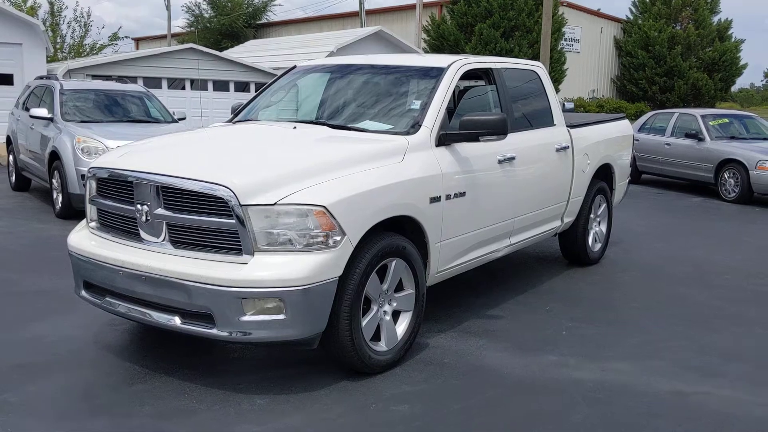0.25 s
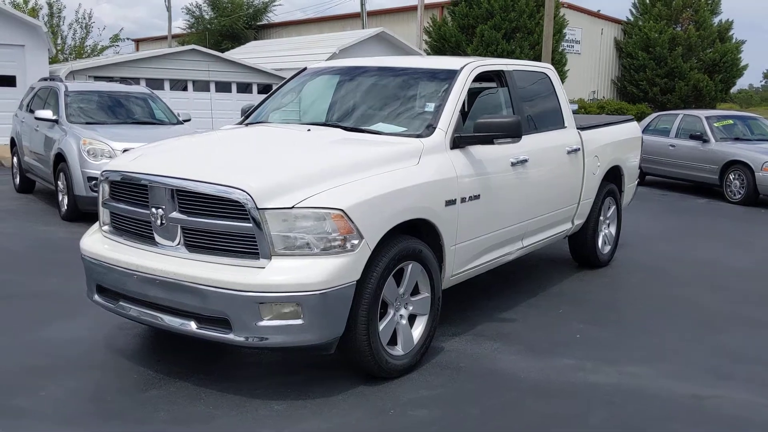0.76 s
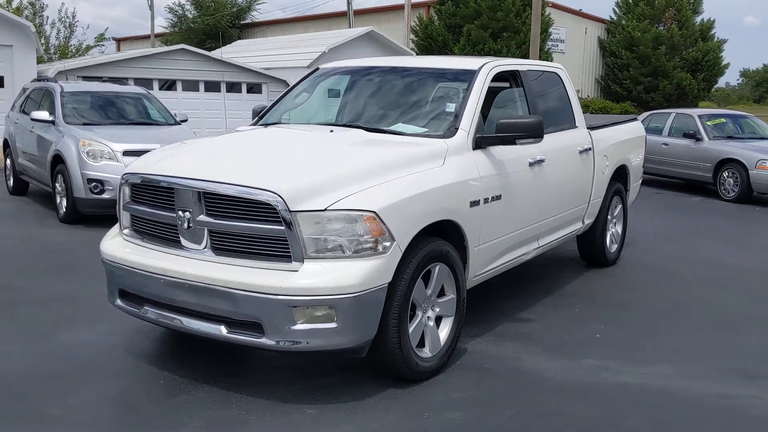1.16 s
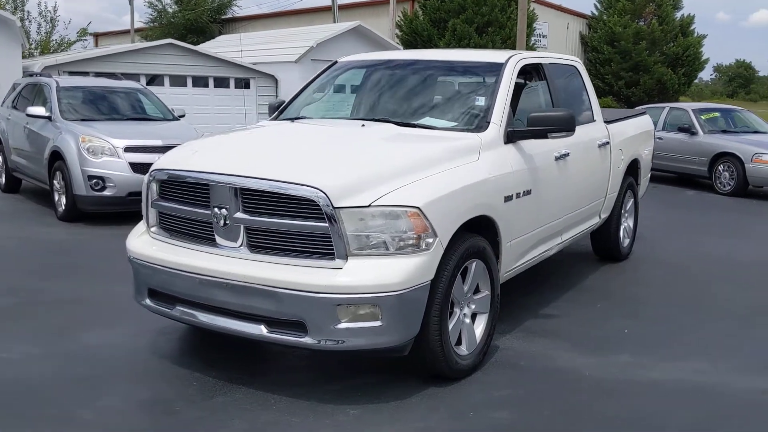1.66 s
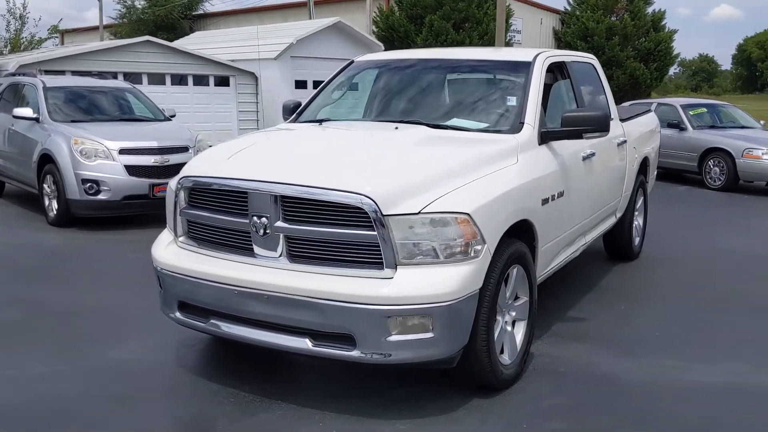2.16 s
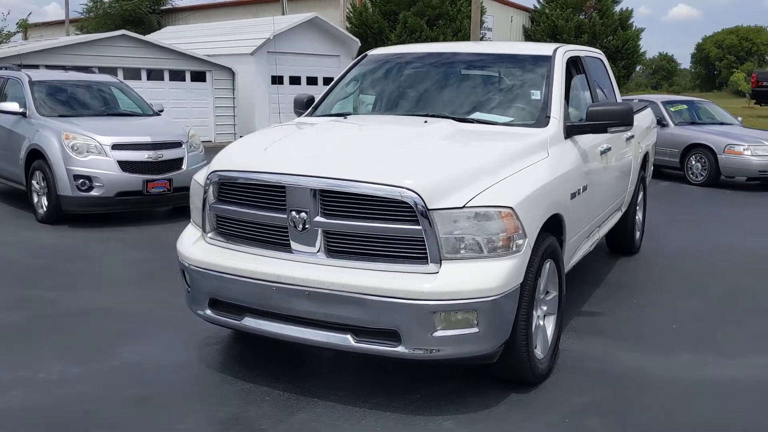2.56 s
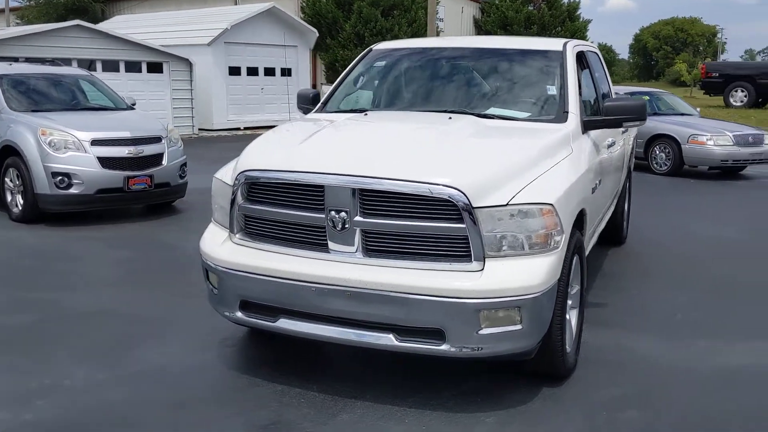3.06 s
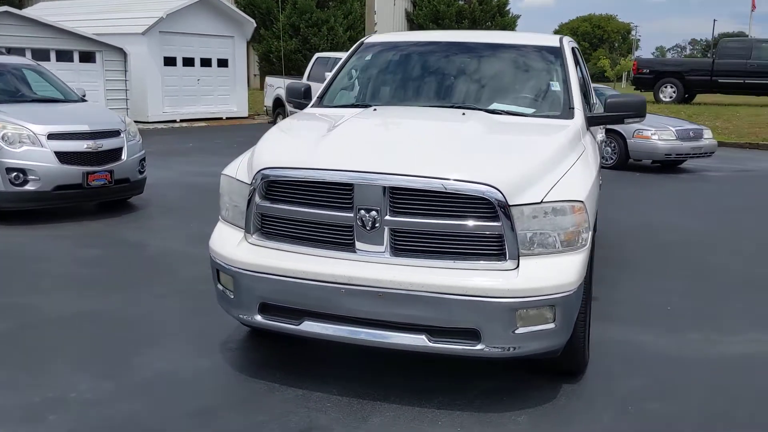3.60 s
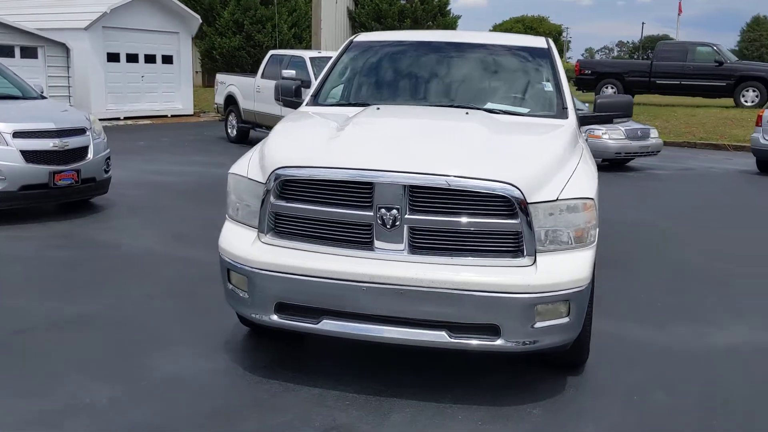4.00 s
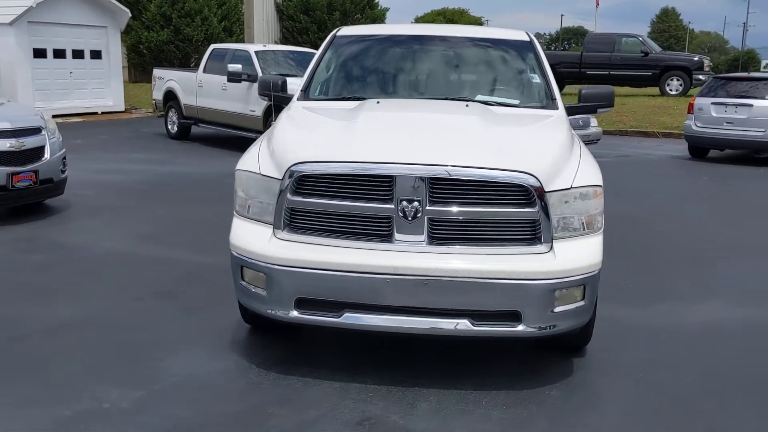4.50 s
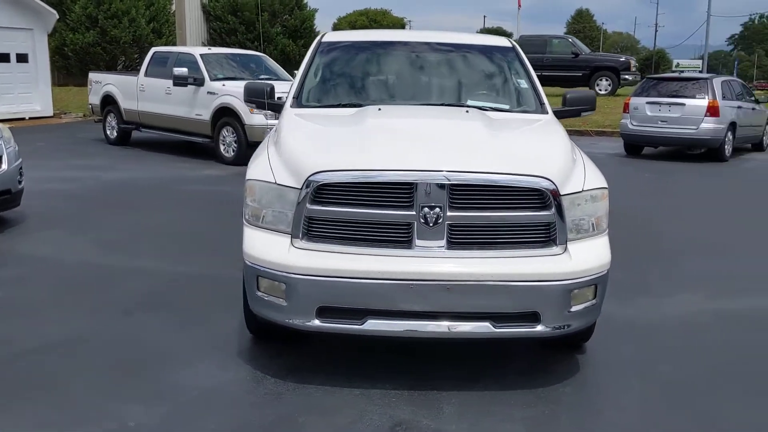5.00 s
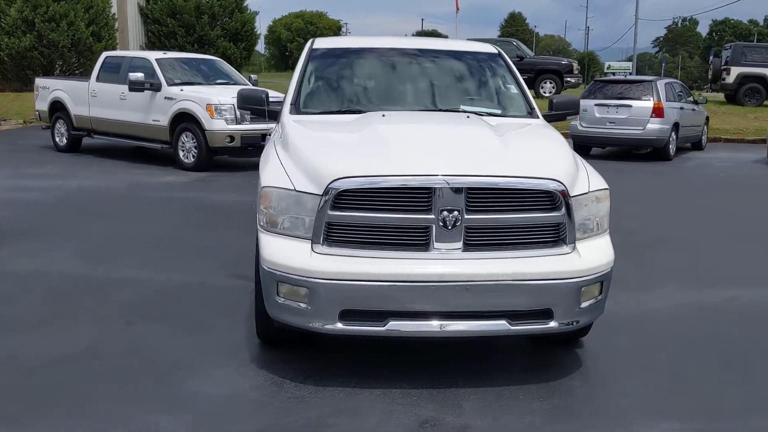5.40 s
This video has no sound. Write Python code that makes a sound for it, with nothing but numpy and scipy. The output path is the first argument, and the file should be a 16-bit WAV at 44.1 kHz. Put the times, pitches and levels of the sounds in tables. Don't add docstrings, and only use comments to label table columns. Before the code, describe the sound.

Passing road vehicles drone and fade behind an idling pickup, whose soft ticking grows clearer, with a few handling clicks on the microphone.

```python
import sys
import numpy as np
from scipy import signal
from scipy.fft import rfft, irfft, next_fast_len
from scipy.io import wavfile
from scipy.ndimage import uniform_filter1d

SR = 44100
rng = np.random.default_rng(int(sys.argv[2]) if len(sys.argv) > 2 else 0)


def bounce(signal):
    frames = np.transpose(np.atleast_2d(signal))
    limited = np.clip(frames, -1, 1)
    pcm = np.round(limited * 32767).astype(np.int16)
    wavfile.write(sys.argv[1], SR, pcm)


def makeup_ratio(level_db):
    decades = np.asarray(level_db, float) / 20
    return 10 ** decades


N = 249118
T = np.arange(N) / SR

LAG_S = 0.00034
SHIFT_S = 1.85
LOST_S, LOST_FOR_S = 5.2088, .0232

# t/s, cycles f/Hz
IDLE_SPEED = [(0, 6.8763), (1, 6.8048), (2.8, 6.6495), (4, 6.765), (5.65, 6.6624)]
# tone number (times the cycle rate), level/dB
IDLE_TONES = [(8, -54), (11, -55), (12, -62), (13, -51.5), (16, -49), (21, -63.5), (22, -52.5), (24, -56.5)]
# t/s, fan level/dB, tick level/dB
WALK = [
    (0, -62, -49),
    (1.5, -58, -51.5),
    (2.5, -56, -51),
    (2.8, -57.5, -48.5),
    (4.5, -57.5, -47.5),
    (5.65, -57.5, -48.5),
]
# f/Hz, level/dB per Hz
FAN_SPECTRUM = [(1400, -6), (2400, 1.5), (3300, -7.5), (4000, -12.5), (4800, -4), (6000, -14),
                (7600, -11.5), (8800, -7.5), (10000, -13.5), (11400, -10.5), (12400, -15.5), (13600, -17),
                (15000, -17), (15800, -21)]
# f/Hz, left-right level/dB
GRILLE_LEAN = [(2200, -4.5), (3900, 11), (5000, 0), (5900, -6), (7300, 5), (8100, 4.5), (9200, 9.5),
               (10300, -8), (11500, -9), (12600, -9), (13500, -11), (15500, -4)]
# (f/Hz, width f/Hz, level/dB)
MAIN_TICK = (0, -0.81, 0.08, 0, [(4800, 3600, 7), (8370, 2000, 6), (11040, 1800, 5), (13500, 2500, 5),
             (15100, 2000, 1)])
SECOND_TICK = (.057, -8, 0.072, 0, [(11950, 800, -4), (13700, 800, -3), (15100, 1200, -7)])
THIRD_TICK = (.114, -7.5, 0.056, 0, [(9060, 270, 5), (12500, 1500, -19)])
SMALL_TICK = (0.02, -7, 0.039, 0, [(9000, 2300, 6), (11750, 700, -8)])

# t/s, firing f/Hz, level/dB between the brief dips
DRONE = [(0, 68.3, -24.5), (.12, 71.1, -23.5), (.5, 71.24, -28), (.95, 70.06, -26), (1.6, 70.05, -24),
         (1.95, 68.35, -28), (2.35, 68.4, -23), (2.7, 68, -26.5), (3.3, 68.5, -29), (4.15, 69.3, -30),
         (4.9, 69.4, -32.5), (5.65, 69, -37)]
# t/s, level/dB, lasting t/s
DRONE_DIPS = [
    (.36, -6.5, 0.061),
    (.61, -4, 0.047),
    (.76, -9.5, 0.045),
    (2.01, -13, 0.059),
    (3.1, -2.5, 0.11),
    (3.63, -3.5, .2),
    (4.58, 0, .12),
]
# t/s, f/Hz, level/dB
LEAVING_CAR = [
    (0, 82, -55),
    (.3, 80.7, -62),
    (.6, 81.7, -51),
    (.9, 78.4, -41),
    (1.3, 78.7, -70),
]
# t/s, cycles f/Hz
SHIFTER_SPEED = [
    (0, 14.69),
    (.8, 14.52),
    (1.28, 14.24),
    (1.66, 14.36),
    (1.85, 16.55),
    (2.0, 16.97),
    (2.2, 17.29),
    (3.3, 17.23),
    (5.65, 17.37),
]
# t/s, level/dB
SHIFTER_LOAD = [(0, -29.5), (.3, -39), (.48, -31), (.8, -26.5), (1.28, -37.5), (1.44, -31.5), (1.68, -38),
                (1.85, -39), (2.0, -35.5), (2.99, -37.5), (3.16, -43), (3.4, -40), (3.7, -43), (4.15, -40),
                (4.45, -51), (4.81, -40), (5.15, -47), (5.5, -44)]
# t/s, level/dB, lasting t/s
HUM_SWELLS = [(.8, 9.5, 0.37), (1.65, 7, 0.22), (2.2, 10, 0.2), (3.2, 8.5, 0.35), (3.95, 7, 0.24),
              (4.9, 8, 0.29), (5.6, 9.5, 0.13)]
# t/s, level/dB, lasting t/s
BOOM_SWELLS = [(2.05, 11, .25), (2.8, 7, 0.16), (3.45, 6, .12), (4.45, 1, 0.16), (5.35, 10, 0.22)]
# tone number, low gear level/dB, high gear level/dB, fading level/dB a second
SIDE_TONES = [(7, -56, -44.5, -2), (3, -50, -47, -7)]
# tone number, level/dB
SMALL_TONES = [(2, -55.5), (9, -55), (10, -62.5), (12, -56), (16, -64), (19, -61)]

# t/s, level/dB
RETREAT = [(0, 0), (.6, -1.5), (1.1, -1), (1.8, -1), (2.3, -3), (2.9, -5.5), (3.3, -5), (3.62, -7),
           (3.83, -5), (4.1, -7), (4.3, -7), (5, -7.5), (5.65, -5)]
# f/Hz, level/dB per Hz
ROAR_SPECTRUM = [(82, -22), (140, -2), (184, -12.5), (236, -8), (276, -17), (335, -11), (382, -9),
                 (526, -16), (634, -10), (900, -21), (1170, -57), (1980, -120)]
# t/s, level/dB, lasting t/s
LULLS = [
    (.25, -11, 0.19),
    (.68, -9, .07),
    (2.35, 4, 0.12),
    (3.4, 3.5, 0.27),
    (4.25, 0, 0.09),
    (5.6, -19, 0.38),
]
# f/Hz, width f/Hz, level/dB, loudest t/s, lasting t/s
HOLLOWS = [
    (228.5, 35, -48, 1.26, 1.1),
    (331.8, 28.5, -46.5, 1.2, 1.7),
    (332.5, 26, -46.5, 3.36, 0.13),
    (638, 180, -51, 2.56, 1.11),
    (920, 300, -45.5, 0.43, 0.77),
]
# f/Hz, level/dB per Hz
RUMBLE_SPECTRUM = [(15, -16), (30, 4), (50, 2.5), (75, 15), (100, 10), (130, -13), (170, -8), (260, -37.5)]
# f/Hz, level/dB per Hz
TYRE_SPECTRUM = [(300, -7), (520, -6.5), (650, -6), (950, -6), (1200, -7.5), (1500, -9.5), (2050, -13),
                 (2500, -27.5), (3400, -31), (6000, -84)]
# f/Hz, level/dB per Hz
HISS_SPECTRUM = [(1300, -24), (2200, 1.5), (2600, -1), (3200, -2.5), (4000, -3.5), (4700, -4.5),
                 (6000, -10.5), (8600, -19.5), (9900, -13), (10500, -15.5), (13000, -26), (16000, -32)]
# t/s, level/dB, lasting t/s
GUSTS = [
    (.43, 4, 0.18),
    (1.2, 4, 0.2),
    (1.7, 5, 0.41),
    (4.59, 2.5, 0.078),
    (4.95, 3.5, 0.14),
    (5.6, 3.5, 0.064),
]
# f/Hz, likeness from 0 to 1
LIKENESS = [(30, 0.72), (60, 0.58), (250, 0.98), (500, 0.64), (1000, 0.6), (2000, 0.094), (4000, 0.14),
            (15000, 0.1)]
# f/Hz, left-right level/dB
ROAD_LEAN = [(60, 0), (600, 2.5), (1700, -0.5), (3300, 7), (5500, 10), (7700, 14.5), (9000, 4), (10000, 6),
             (11700, 9), (13000, -3), (14500, 1)]

# t/s, peak level/dB, f/Hz, fall by 60 dB t/s, left-right level/dB
CLICKS = [(0.0812, -31, 4200, 0.0023, -14), (0.4463, -48, 13000, .004, -6),
          (0.5638, -33, 5400, 0.00071, 15), (.5662, -15, 4100, 0.0011, 26), (0.5658, -17, 1230, 0.0037, 13),
          (0.6023, -28, 5080, 0.0024, 27), (.6026, -33, 2610, 0.0041, 17), (.6515, -44, 9450, 0.014, 12),
          (0.656, -45.5, 8900, .02, 14), (2.7160, -22.5, 2200, 0.0015, 9),
          (5.3586, -29.5, 3617, 0.0019, 13), (5.3589, -33, 1796, 0.0029, 6)]
# start t/s, end t/s
SCRAPE_SPAN = (.543, .5658)
# level/dB, f/Hz, width f/Hz
SCRAPE = (-38.5, 5000, 8000)
# f/Hz, level/dB per Hz
LEAF_SPECTRUM = [(3000, -30), (5500, -8), (7000, -3), (9800, 3), (10500, -18), (14000, -30)]
# t/s, level/dB, lasting t/s
LEAF_GUSTS = [
    (1.2, 14, 0.14),
    (1.65, 23, 0.37),
]


def evened(x):
    return x / np.sqrt(np.mean(x ** 2) + 1e-20)


def read(points, hz):
    f, value = np.transpose(points)
    return np.interp(np.log(hz + 1), np.log(f + 1), value)


def columns(rows):
    s, *values = np.transpose(rows)
    return [np.interp(T, s, v) for v in values]


def swells(rows):
    return sum(db * np.exp(-((T - s) / span) ** 2) for s, db, span in rows)


def sides(db):
    return makeup_ratio(np.array([[db / 2], [-db / 2]]))


def shadow(x, points):
    size = next_fast_len(N)
    lean = makeup_ratio(read(points, np.fft.rfftfreq(size, 1 / SR)) / 2)
    return irfft(rfft(x, size) * np.array([lean, 1 / lean]), size)[:, :N]


def wander(hz):
    slow_t = T[::64]
    rates = np.geomspace(hz / 10, hz, 16)
    drift = sum(np.sin(2 * np.pi * (f * slow_t + rng.random())) for f in rates)
    return evened(drift).repeat(64)[:N]


def resonate(x, hz, width):
    b, a = signal.iirpeak(hz, hz / width, SR)
    return signal.lfilter(b, a, signal.lfilter(b, a, x))


def wash(spectrum, patchy_db, size=1024):
    frames, hz = 4 * N // size + 5, np.fft.rfftfreq(size, 1 / SR)
    a, b, c, d, patches = rng.standard_normal((frames, len(hz), 5)).T
    patches = uniform_filter1d(patches, size=size // 40, axis=0)
    patches = evened(uniform_filter1d(patches, size=16000 // size, axis=1))
    same = np.clip(read(LIKENESS, hz), 0, 1)[:, None]
    right = a + 1j * b
    late = np.exp(-2j * np.pi * hz * LAG_S)[:, None]
    left = same * right * late + np.sqrt(1 - same ** 2) * (c + 1j * d)
    z = np.array([left, right]) * makeup_ratio(read(spectrum, hz)[:, None] + patchy_db * patches)
    out = signal.istft(z, nperseg=size, noverlap=3 * size // 4)[1][:, :N]
    return out / np.sqrt(np.mean(out.mean(0) ** 2))


def turns(hz):
    return np.cumsum(hz) / SR + hz * LOST_FOR_S * (T >= LOST_S)


def engine_tone(count, db, waver_db=3.0):
    level = makeup_ratio(db + waver_db * wander(9))
    return np.sqrt(2) * level * np.sin(2 * np.pi * (count + rng.random()))


def idling_exhaust(count):
    return sum(engine_tone(k * count, db, waver_db=0.0) for k, db in IDLE_TONES)


def fan_and_belts():
    fan_db = columns(WALK)[0]
    return makeup_ratio(fan_db) * wash(FAN_SPECTRUM, patchy_db=0.76, size=512)


def droning_vehicle():
    hz, db = columns(DRONE)
    count = turns(hz)
    firing = engine_tone(count, db + swells(DRONE_DIPS), waver_db=0.85)
    return firing + engine_tone(2 * count, np.where(T < SHIFT_S, -49, -80))


def leaving_car():
    hz, db = columns(LEAVING_CAR)
    return engine_tone(turns(hz), db)


def gear_changing_vehicle():
    count, low_gear = turns(columns(SHIFTER_SPEED)[0]), T < SHIFT_S
    out = engine_tone(8 * count, columns(SHIFTER_LOAD)[0], waver_db=1.26)
    out += engine_tone(13 * count, -55 + swells(HUM_SWELLS), waver_db=1.26)
    boom_db = np.where(low_gear, -60, -48 + swells(BOOM_SWELLS))
    out += engine_tone(5 * count, boom_db, waver_db=1.26)
    for k, low_db, high_db, fade_db in SIDE_TONES:
        db = np.where(low_gear, low_db, high_db + fade_db * (T - SHIFT_S))
        out += engine_tone(k * count, db)
    return out + sum(engine_tone(k * count, db) for k, db in SMALL_TONES)


def low_road_roar():
    low_db = -40.5 + 1.45 * columns(RETREAT)[0] + swells(LULLS)
    roar = wash(ROAR_SPECTRUM, patchy_db=0.5, size=2048)
    out = makeup_ratio(low_db) * roar
    for hz, width, db, s, span in HOLLOWS:
        out += makeup_ratio(db - 8.4 * ((T - s) / span) ** 2) * evened(resonate(roar, hz, width))
    rumble_db = -45.5 + .5 * (low_db + 43.5)
    return out + makeup_ratio(rumble_db) * wash(RUMBLE_SPECTRUM, patchy_db=1.5, size=4096)


def tyre_roar():
    return makeup_ratio(-41 + columns(RETREAT)[0]) * wash(TYRE_SPECTRUM, patchy_db=0.5)


def gusty_hiss():
    hiss_db = -57 + 0.83 * columns(RETREAT)[0] + swells(GUSTS)
    return makeup_ratio(hiss_db) * wash(HISS_SPECTRUM, patchy_db=1.5)


def tick(times, levels_db, delay, db, t60, lean_db, parts):
    t, drive = np.arange(5000) / SR, np.zeros(N + 9000)
    for s, level_db in zip(times + delay, levels_db):
        rise = np.clip(t / 0.0031, 0, 1)
        drive[round(s * SR):][:len(t)] += makeup_ratio(level_db + db - 60 * t / t60) * rise
    noise = rng.standard_normal((2, N))
    rings = sum(makeup_ratio(d) * resonate(noise, hz, w) / np.sqrt(w) for hz, w, d in parts)
    return sides(lean_db) * drive[:N] * evened(rings)


def valve_ticks(count):
    first_turn = .4671
    at = np.flatnonzero(np.diff(np.floor(count - first_turn)))
    s, chance = T[at], rng.standard_normal((len(at), 3)).T
    db = columns(WALK)[1][at] + chance[0]
    second_db = db - 2.5 + 3.5 * chance[1]
    third_db = db - 3.5 + 3.5 * chance[2]
    ticks = tick(s, db, *MAIN_TICK) + tick(s, second_db, *SECOND_TICK)
    ticks += tick(s, third_db, *THIRD_TICK) + tick(s, db, *SMALL_TICK)
    return makeup_ratio(2.0) * ticks


def handling_clicks():
    out, t = np.zeros((2, N + 2000)), np.arange(2000) / SR
    for s, db, hz, t60, lean_db in CLICKS:
        shape = makeup_ratio(db - 60 * t / t60) * np.minimum(2 * hz * t, 1)
        out[:, round(s * SR):][:, :2000] += sides(lean_db) * shape * np.sin(2 * np.pi * hz * t)
    return out[:, :N]


def finger_scrape():
    db, hz, width = SCRAPE
    start, end = SCRAPE_SPAN
    grow = np.clip((T - start) / (end - start), 0, 1) ** 2.0 * (T < end)
    grains_db = 4 * np.minimum(rng.exponential(1, N // 20 + 1), 3)
    grit = rng.standard_normal(N) * makeup_ratio(grains_db.repeat(20)[:N])
    return sides(21.6) * makeup_ratio(db) * grow * evened(resonate(grit, hz, width))


def rustling_leaves():
    return makeup_ratio(-85.5 + swells(LEAF_GUSTS)) * wash(LEAF_SPECTRUM, patchy_db=1.0)


def jump_at_loss(tones):
    at = np.searchsorted(T, LOST_S)
    jump = -makeup_ratio(-24) - (tones[at] - tones[at - 1])
    tones[at:] += jump * np.exp(-T[:N - at] / .0012)
    late = np.roll(tones, round(LAG_S * SR))
    near = slice(at - 400, at + 400)
    late[near] = tones[near] + (late - tones)[at - 400] * np.linspace(1, 0, 800)
    return sides(2.04) * np.array([late, tones])


def scene():
    count = turns(columns(IDLE_SPEED)[0])
    tones = idling_exhaust(count) + droning_vehicle() + leaving_car() + gear_changing_vehicle()
    grille = fan_and_belts() + valve_ticks(count)
    road = low_road_roar() + tyre_roar() + gusty_hiss() + rustling_leaves()
    out = jump_at_loss(tones) + shadow(road, ROAD_LEAN) + shadow(grille, GRILLE_LEAN)
    return out + handling_clicks() + finger_scrape()


def roll_off(x):
    return signal.sosfilt(signal.butter(12, 15770, fs=SR, output="sos"), x)


def record(dry):
    edge = signal.firwin(511, 15900, window=("kaiser", 9), fs=SR)
    mix = signal.oaconvolve(dry, edge[None], "same")
    return roll_off(mix)


dry = scene()
out = record(dry)
bounce(out)
```